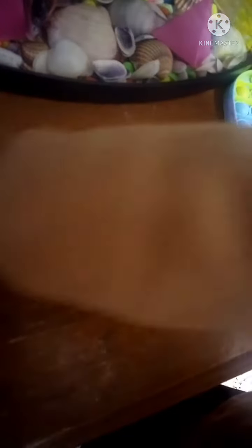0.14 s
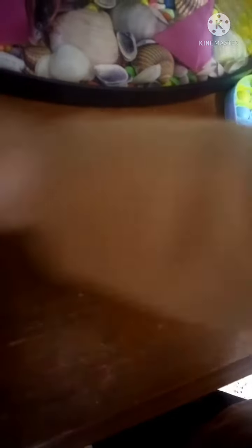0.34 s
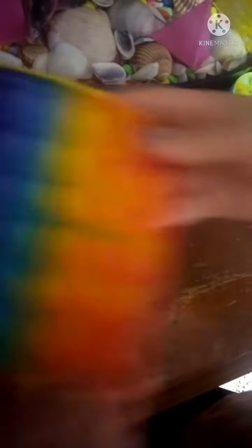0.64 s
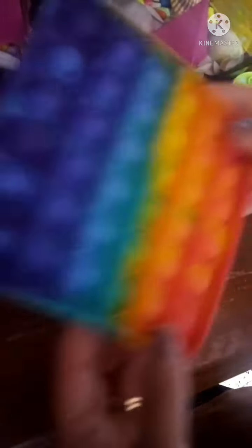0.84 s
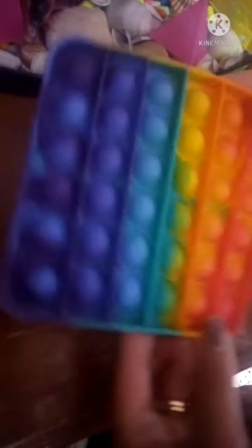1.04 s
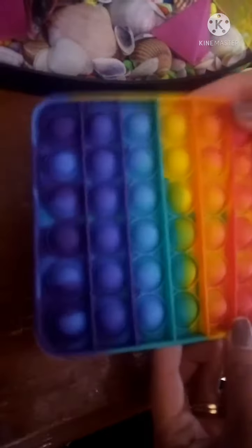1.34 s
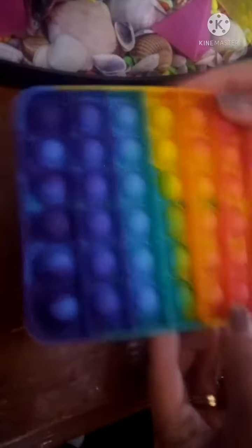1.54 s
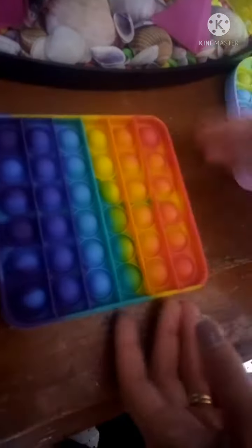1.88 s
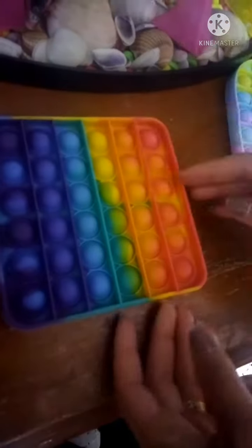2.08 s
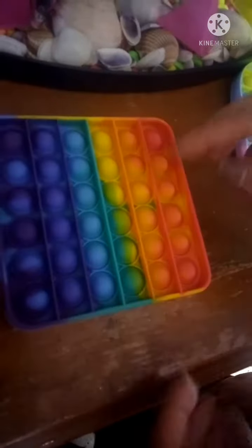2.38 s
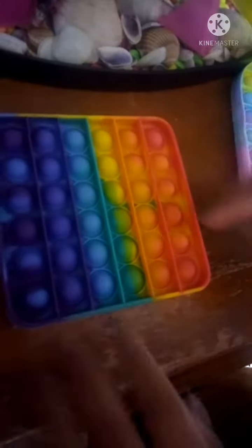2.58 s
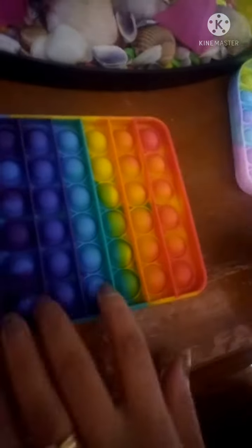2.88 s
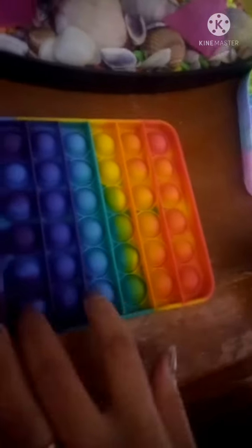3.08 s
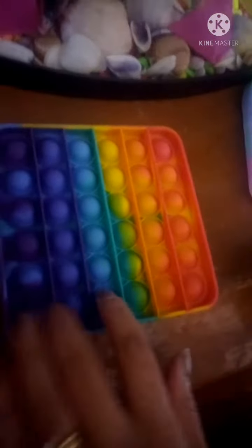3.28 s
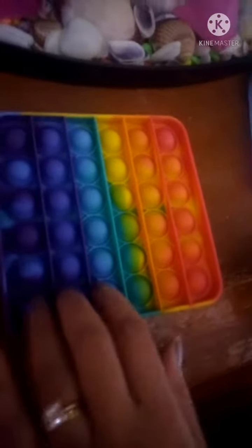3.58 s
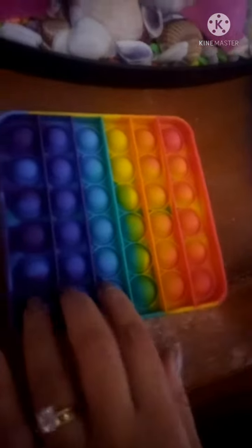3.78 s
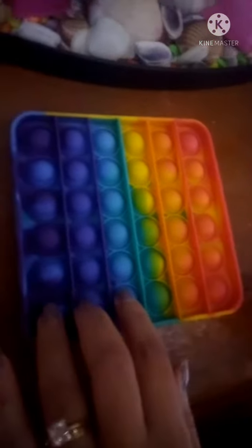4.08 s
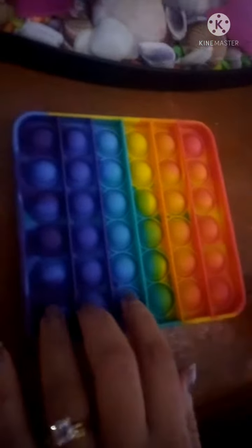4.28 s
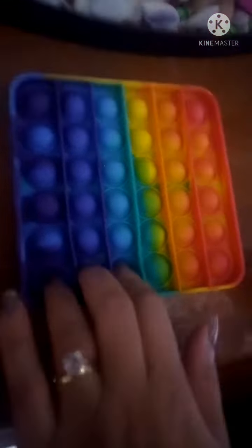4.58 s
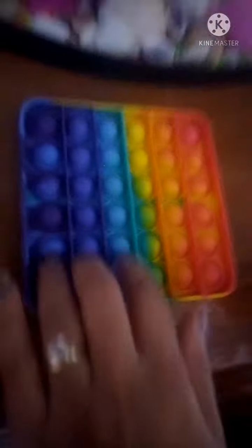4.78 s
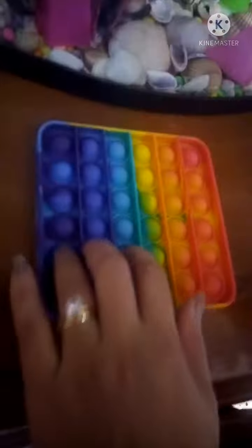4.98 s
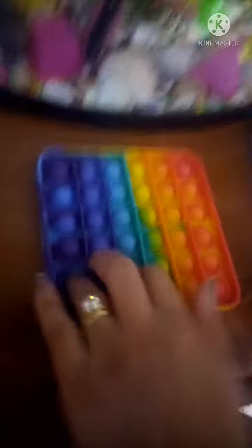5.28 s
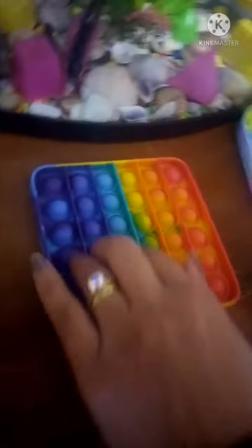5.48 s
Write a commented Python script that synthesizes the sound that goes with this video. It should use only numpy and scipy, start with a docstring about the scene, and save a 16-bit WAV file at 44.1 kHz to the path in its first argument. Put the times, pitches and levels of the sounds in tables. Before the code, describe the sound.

Soft bumps and rubbery squeaks come first, within the opening second. Then a flexible toy drops onto a wooden tabletop, the loudest event, its quick contacts merging into one clattering slap with sparse room echoes. Small taps trail off. After a quiet gap with a faint gliding hum, fingers knock the wood in two strong bursts, ending in a bright rub. Close, slightly dull microphone.

```python
"""A silicone bubble toy squeaks over a wooden table, drops onto it and rolls flat; then come taps and rubbing.
Short pushes ring the modes of the table top, with a noisy crack; wavering slips squeak; shaped noise rubs.
A bare room answers with sparse echoes. Behind it are a far motor's gliding drone, thin whistles made of
narrow noise, low murk and room air. A small microphone close by colours it all."""
import sys
import numpy as np
from scipy import signal
from scipy.fft import rfft, irfft
from scipy.io import wavfile
from scipy.ndimage import uniform_filter1d

SR = 44100
rng = np.random.default_rng(int(sys.argv[2]) if len(sys.argv) > 2 else 0)


def materialize(psi):
    """Save the field psi as 16-bit PCM at rate SR to the path in sys.argv[1].

    A 1-D psi becomes a single channel; in a 2-D psi each row is a channel.
    """
    bounded = np.clip(np.atleast_2d(psi).T, -1, 1)
    quanta = np.round(bounded * 32767).astype(np.int16)
    wavfile.write(sys.argv[1], SR, quanta)


def elevation(decibels):
    """Turn decibel levels (scalar or array-like) into linear amplitude ratios."""
    levels = np.asarray(decibels, float)
    return 10 ** (levels / 20)


N = 248724  # samples in the scene


def evened(x):
    """Scales a signal to rms 1."""
    return x / np.sqrt(np.mean(x ** 2) + 1e-20)


def read(points, hz):
    """Reads a spectrum on a log-frequency axis."""
    point_hz, value = np.transpose(points)
    return np.interp(np.log(hz + 1), np.log(point_hz + 1), value)


def add(mix, start_s, sound):
    """Mixes a sound in at a time, cutting off what runs past the end."""
    part = mix[round(start_s * SR):][:len(sound)]
    part += sound[:len(part)]


def columns(rows):
    """Gives the start time of a curve and each of its columns at sample rate."""
    s, *values = np.transpose(rows)
    t = np.arange(s[0], s[-1], 1 / SR)
    return s[0], [np.interp(t, s, v) for v in values]


def noise(points, size):
    """Makes noise of rms 1 with the given spectrum."""
    hz = np.fft.rfftfreq(size, 1 / SR)
    spectrum = rfft(rng.standard_normal(size)) * elevation(read(points, hz))
    return evened(irfft(spectrum, size))


def narrow(hz, width_hz, size):
    """Makes noise of rms 1 around one pitch: slow noise, smoothed twice, turns a steady tone."""
    r = np.exp(-np.pi * width_hz / SR)
    slow = rng.standard_normal(size) + 1j * rng.standard_normal(size)
    for _ in range(2):
        slow = signal.lfilter([1 - r], [1, -r], slow)
    tone = np.exp(2j * np.pi * hz * np.arange(size) / SR)
    return evened((slow * tone).real)


def ring(hz, db, t60_s):
    """One mode of the table: a sine that falls by 60 dB in t60_s."""
    t = np.arange(SR // 2) / SR
    return elevation(db - 60 * t / t60_s) * np.sin(2 * np.pi * hz * t)


def room(x):
    """Room echoes: sparse taps of random sign, each band dying at its own speed, new at every call."""
    # how long echoes last: pitch_hz, t60_s
    decay = [(100, 0.99), (300, 0.64), (1000, 0.72), (2500, 0.69), (5000, 0.48), (9000, 0.99)]
    # how strongly each pitch comes back: pitch_hz, relative level_db
    colour = [(80, -6.5), (300, 4), (700, 4), (1200, 0.5), (2500, 0.5), (4000, -1.5), (6000, -1.5)]
    taps = np.zeros(SR // 2)
    at = np.arange(400, len(taps) - 20, 20)
    taps[at + rng.integers(0, 20, at.shape)] = rng.choice([-1., 1.], at.shape)
    hz, t, z = signal.stft(taps, SR, nperseg=512)
    db = read(colour, hz)[:, None] - 60 * t / read(decay, hz)[:, None]
    tail = signal.istft(z * elevation(db), SR, nperseg=512)[1]
    return signal.fftconvolve(x, tail / np.linalg.norm(tail))


def room_air():
    """Steady noise of the air in the room."""
    # spectrum: pitch_hz, relative level_db (per Hz)
    air = [(20, -32), (45, -9), (64, -13.5), (120, -8.5), (200, -5.5), (400, -12.5), (800, -23),
           (2000, -27.5), (5000, -35), (7000, -37.5), (15000, -34.5)]
    return elevation(-57.5) * noise(air, size=N)


def murk():
    """Low murk: narrow noise at room resonances, rising and falling together."""
    # loudness curve: time_s, level_db
    rumble = [(0.0, -50.5), (0.55, -57.5), (1.74, -59.5), (1.9, -50.5), (2.3, -58), (2.6, -54),
              (4.2, -66.5), (4.63, -55), (5.0, -63.5), (5.26, -50), (5.64, -91)]
    # room resonances: pitch_hz, width_hz (of each smoothing), relative level_db
    peaks = [(65.8, 35.3, 1), (106.8, 5.4, 1.5), (149.5, 29, -0.5)]
    out = np.zeros(N)
    start_s, (db,) = columns(rumble)
    hum = sum(elevation(peak_db) * narrow(hz, width_hz, size=len(db)) for hz, width_hz, peak_db in peaks)
    add(out, start_s, elevation(db) * evened(hum))
    return out


def whistles():
    """Thin whistles: bits of very narrow noise that swell and fade."""
    # one row a whistle: start_s, length_s, pitch_hz, width_hz (of each smoothing), level_db (before the swell)
    trills = [(2.651, 0.32, 4670, 131, -70.5), (3.201, 0.3, 4700, 116, -71), (3.37, .28, 4530, 30, -76),
              (2.916, .12, 1940, 60, -70.5), (3.068, 0.13, 1940, 60, -73), (3.236, 0.1, 1990, 60, -70.5)]
    out = np.zeros(N)
    for start_s, length_s, hz, width_hz, db in trills:
        size = round(length_s * SR)
        swell = np.sin(np.pi * np.arange(size) / size)
        add(out, start_s, elevation(db) * narrow(hz, width_hz, size=size) * swell)
    return out


def far_motor():
    """A far motor drones: a sine that glides in pitch and level, in separate stretches."""
    # one list a stretch, with rows of: time_s, pitch_hz, level_db (rms, before the end fades)
    drones = [
        [(1.25, 174.3, -81), (1.3, 168.9, -57.5), (1.72, 175.3, -58.5)],
        [(2.25, 206.4, -68), (2.3, 208.4, -59.5), (2.74, 218, -59), (3.28, 221, -51), (3.42, 219, -54.5),
         (3.45, 217, -72)],
        [(3.58, 220.7, -64.5), (3.7, 222.9, -56), (3.9, 222, -66.5), (4.06, 223, -53.5), (4.32, 221.5, -59),
         (4.39, 220.7, -61)],
    ]
    out = np.zeros(N)
    for rows in drones:
        start_s, (hz, db) = columns(rows)
        tone = np.sqrt(2) * np.sin(2 * np.pi * np.cumsum(hz) / SR)
        add(out, start_s, elevation(db) * tone * signal.windows.tukey(len(hz), .1))
    return out


def table_rocks():
    """Weight set down rocks the whole table on its legs: a low sine that swells briefly, then dies."""
    # one row a rock: start_s, level_db (before the swell and decay)
    rocks = [(.136, -37), (0.63, -38), (1.378, -42), (1.748, -19.5), (4.478, -25), (4.516, -25),
             (5.145, -26.5), (5.338, -43.5)]
    out = np.zeros(N)
    for start_s, db in rocks:
        sound = ring(95.3, db, t60_s=0.3)
        swell = np.minimum(np.arange(len(sound)) / (0.024 * SR), 1)
        add(out, start_s, sound * swell)
    return out


def slides():
    """Hands and toy rub the wood: hiss, dull for the toy and bright for skin, with an uneven grain."""
    # one row a stroke: start_s, length_s, loudest_share (0-1), level_db (of either hiss before mixing),
    # brightness (0-1)
    strokes = [(0.127, .09, 0.15, -49.5, 0.13), (0.216, .2, 0.87, -53, .12), (0.399, 0.076, .4, -48, 0.08),
               (0.494, .175, .8, -48, 0), (.68, 0.91, 0.14, -56.5, 0.32), (2.918, .2, 0.14, -63.5, 0.96),
               (3.078, .36, 0.5, -61, 0.6), (5.193, 0.23, 0.4, -53.5, .25), (5.389, .12, 0.7, -51, 0.97),
               (5.489, .13, .5, -46, 0.87)]
    # toy on wood: pitch_hz, relative level_db (per Hz)
    dull = [(80, -34.5), (200, -2.5), (500, -7.5), (1000, -17), (2500, -22.5), (4000, -32.5), (15000, -70)]
    # skin on wood: pitch_hz, relative level_db (per Hz)
    skin = [(150, 2.5), (600, -2), (1900, -1), (3500, -6), (6500, -12), (10000, -13.5), (15000, -12.5)]
    out = np.zeros(N)
    ends_db, grain_db = -5.5, 1.0  # stroke ends against its loudest point; rms unevenness
    for start_s, length_s, loudest, level_db, bright in strokes:
        share = np.arange(round(length_s * SR)) / (length_s * SR)
        size = len(share)
        db = level_db + np.interp(share, [0, loudest, 1], [ends_db, 0, ends_db])
        grain = evened(uniform_filter1d(rng.standard_normal(size), 300))
        hiss = (1 - bright) * noise(dull, size=size) + bright * noise(skin, size=size)
        add(out, start_s, elevation(db + grain_db * grain) * hiss * signal.windows.tukey(size, .25))
    return out


def squeaks():
    """Silicone sticks and slips at a wavering rate; irregular slips smear the overtones."""
    # one list a squeak, with rows of: time_s, slips_hz (before the waver), level_db
    slips = [
        [(.293, 640, -61), (.299, 650, -50), (.317, 766, -44.5), (.335, 800, -54.5), (.37, 1300, -68)],
        [(.404, 405, -75), (.418, 412, -35.5), (.447, 415, -36.5), (.47, 420, -42), (.53, 420, -43),
         (.54, 560, -68)],
        [(.43, 494, -46.5), (.474, 530, -35), (.485, 560, -54.5), (.5, 590, -36), (.515, 550, -45),
         (.56, 510, -60)],
        [(.54, 230, -46.5), (.57, 220, -43.5), (.615, 270, -44.5), (.635, 260, -41), (.655, 250, -39.5),
         (.67, 360, -53), (.72, 270, -69)],
    ]
    # one row a squeak: relative level_db of partials 1 to 6 at the start
    partials = [(0, -12.5, -37, -35, -40, -40), (0, -10, 2, -1, -20, -15.5), (0, 2, -6.5, -10, -11.5, -34),
                (0, 2, -44, -29, -28, -30)]
    # how uneven the slips are, one row a squeak: start (0-1), end (0-1)
    uneven = [(0.11, 0.4), (0.14, 0.3), (0.23, .1), (0.4, 1)]
    out = np.zeros(N)
    fade = 78.0  # dB a second, times the number of the overtone
    for rows, partials_db, irregular in zip(slips, partials, uneven):
        start_s, (hz, db) = columns(rows)
        t = np.arange(len(hz)) / SR
        rough = np.linspace(*irregular, len(hz))
        waver = evened(uniform_filter1d(rng.standard_normal((2, len(hz))), 70, axis=1))
        turns = np.cumsum(hz * (1 + 0.284 * rough * waver[0])) / SR
        # overtones thin out as the grip loosens
        tone = sum(elevation(partial_db - fade * k * t) * np.sin(2 * np.pi * (k + 1) * turns)
                   for k, partial_db in enumerate(partials_db))
        add(out, start_s, elevation(db + 0.77 * rough * waver[1]) * evened(tone))
    return out


def blow(force_db, crack_db, favoured_hz, length_ms, echo_db):
    """A push and the patter of bubbles landing after it ring the top, with a crack and room echoes."""
    # table top modes: pitch_hz, level_db (before favouring and scatter), t60_s (for a 25 ms blow, before damping)
    modes = [(195, -19, 0.15), (250, -51.5, 0.039), (287.6, -4, 0.32), (310, -5.5, 0.22),
             (435.7, -13, 0.13), (536, -8.5, 0.11), (568, -10.5, 0.11), (650, -15.5, 0.16),
             (746.4, -3, 0.085), (852, 3.5, 0.028), (970, -0.5, 0.015), (1131, 10, 0.0442),
             (1287, 8.5, 0.02), (1537, 1, 0.016), (1897, 1, 0.065), (2127, -3, 0.032), (2500, -20, 0.038),
             (3173, -5.5, 0.084), (3640, -21.5, 0.026)]
    # skin and silicone slapping wood: pitch_hz, relative level_db (per Hz, for a crack_db of -6)
    slap = [(900, -6), (1800, 6.5), (2500, -0.5), (3500, 0.5), (5200, -2.5), (6500, -12), (9000, -22),
            (15000, -25.5)]
    focus_db, scatter_db, detune = 16.5, 2.5, 0.027  # loss an octave squared off; spread of level and pitch
    t = np.arange(SR // 10) / SR
    length_s = length_ms / 1000
    dying = elevation(-20 * t / length_s) * np.minimum(t / 0.0023, 1)
    bubbles = rng.standard_normal(len(t)) * (rng.random(len(t)) < .05)
    force = 0.78 * dying * bubbles
    force[0] -= 1  # the push itself
    contact = signal.windows.hann(round(.4 * SR / favoured_hz) + 2)  # a harder contact is shorter
    force = np.convolve(force, contact)
    # hardness and spot favour modes near one pitch; a short tap leaves the finger down and damps the ring
    top = 0
    for hz, db, t60_s in modes:
        pitch_luck, level_luck = rng.standard_normal(2)
        mode_db = db + scatter_db * level_luck - focus_db * np.log2(hz / favoured_hz) ** 2
        top = top + ring(hz * (1 + detune * pitch_luck), mode_db, t60_s * length_s / 0.025)
    low_cut = signal.butter(2, 170, "high", fs=SR)  # a panel sheds little bass
    sound = signal.lfilter(*low_cut, signal.fftconvolve(force, top))
    sound /= abs(sound).max()
    # a harder slap is brighter
    colour = [(hz, db + 0.81 * (crack_db + 6.0) * np.log2(hz / 3000)) for hz, db in slap]
    add(sound, 0, elevation(crack_db) * dying * noise(colour, size=len(t)))
    heard = elevation(echo_db) * room(sound)
    add(heard, 0, sound)
    return elevation(force_db) * heard


def taps_on_top():
    """Fingers and bubbles strike the top; a hand on the toy muffles the room's answer."""
    # one row a strike: start_s, force_db (peak of the ring), crack_db (over force, before it dies),
    # favoured_hz, length_ms (to fall 20 dB)
    strikes = [(0.136, -36, -27, 288, 4.6), (.16, -47, -9, 623, 14), (0.632, -45, -30, 250, 12),
               (1.764, -23, -22, 2720, 7.2), (1.883, -30, -17, 300, 19), (1.945, -37, -23, 304, 7.6),
               (2.035, -44, -30, 304, 8.6), (3.471, -44.5, -10, 1310, 8.8), (3.479, -37, -20, 286, 9.4),
               (4.406, -34.5, -5.5, 475, 3.1), (4.447, -43.5, -7, 890, 4.7), (4.465, -13.5, -12.5, 553, 12),
               (4.476, -16, -9, 518, 9), (4.516, -30, -29, 430, 5.6), (4.52, -24, -7.5, 1200, 9.2),
               (4.527, -20, -16, 610, 6.1), (4.566, -40, -13, 1600, 2.1), (4.706, -45.5, -5, 1570, 3),
               (4.762, -50, 2.5, 2500, 2.2), (4.91, -45, -1, 1500, 2.9), (5.135, -17, -12.5, 506, 3.9),
               (5.14, -16, -13, 2180, 7.3), (5.146, -17.5, -21, 515, 24), (5.337, -35, -22, 1430, 2.3),
               (5.345, -37, -2, 580, 8), (5.531, -50, -30, 200, 5)]
    out = np.zeros(N)
    for start_s, *row in strikes:
        add(out, start_s, blow(*row, echo_db=-14))
    return out


def toy_drop():
    """The toy lands edge first and rolls flat: each contact is later, softer, lower and longer."""
    out = np.zeros(N)
    for k in range(4):
        sound = blow(force_db=-7 - 1.2 * k ** 2, crack_db=-17, favoured_hz=1390 / 2 ** (0.75 * k),
                     length_ms=8.1 + 4.5 * k, echo_db=-9)  # the free drop carries into the room
        add(out, 1.743 + 0.0055 * k, sound)
    return out


def scene():
    """Everything on the table, its echo, and the background."""
    background = room_air() + murk() + whistles() + far_motor()
    rubbing = slides() + squeaks()
    rubbing += elevation(-12.0) * room(rubbing)[:N]
    table = table_rocks() + taps_on_top() + toy_drop()
    return (background + rubbing + table)[None]


def roll_off(x):
    """The treble ends steeply here."""
    return signal.sosfilt(signal.butter(12, 15670, fs=SR, output="sos"), x)


def record(dry):
    """The small microphone colours the sound with a causal, minimum-phase filter."""
    # microphone response: pitch_hz, gain_db
    response = [(20, -11), (50, -2), (85, -1.5), (6300, 0.5), (8000, -10.5), (13800, -13.5), (14800, -2),
                (15600, -5.5)]
    log_gain = np.log(elevation(read(response, abs(np.fft.fftfreq(8192, 1 / SR)))))
    taps = np.fft.ifft(np.exp(np.conj(signal.hilbert(log_gain)))).real[:4096]
    mix = signal.fftconvolve(dry, taps[None])[:, :N]
    return roll_off(mix)


dry = scene()
out = record(dry)
materialize(out)
```